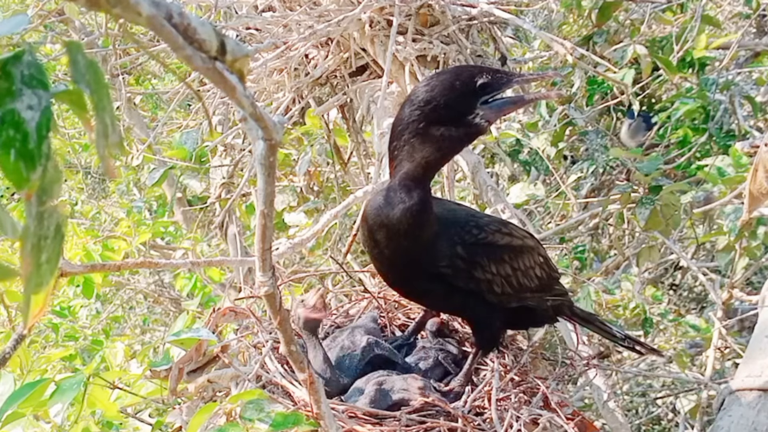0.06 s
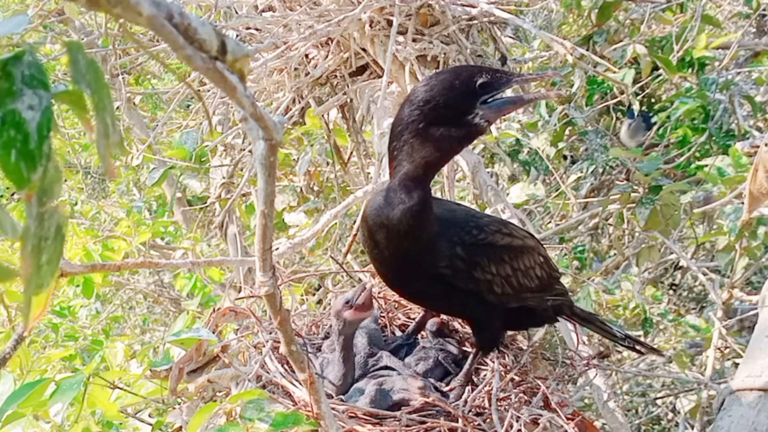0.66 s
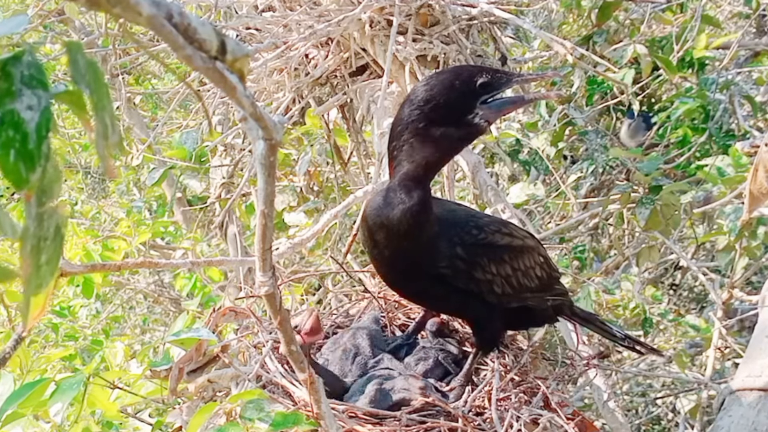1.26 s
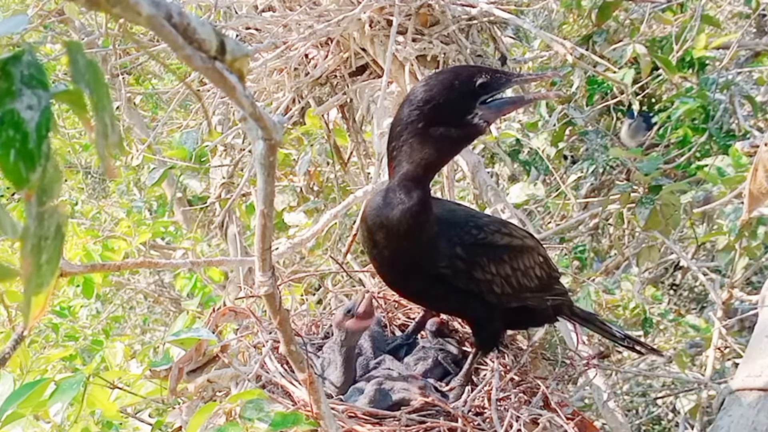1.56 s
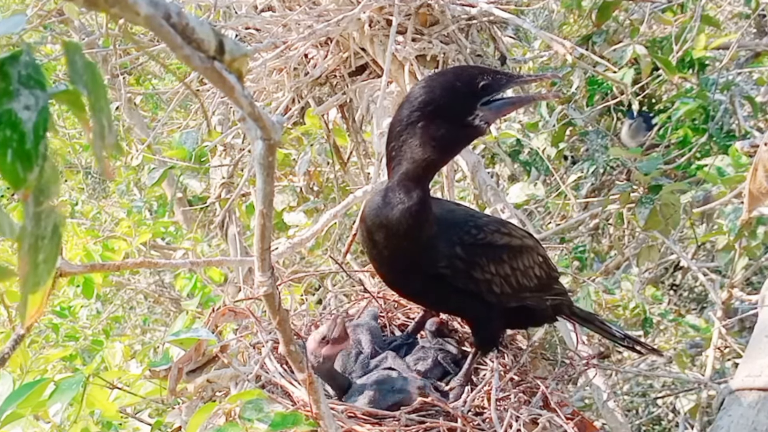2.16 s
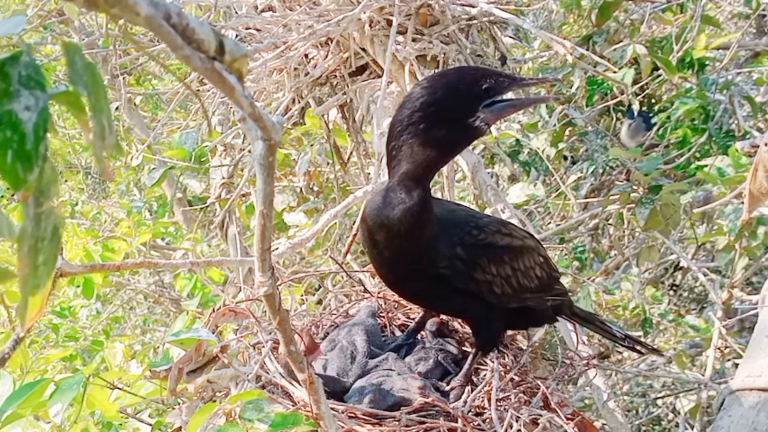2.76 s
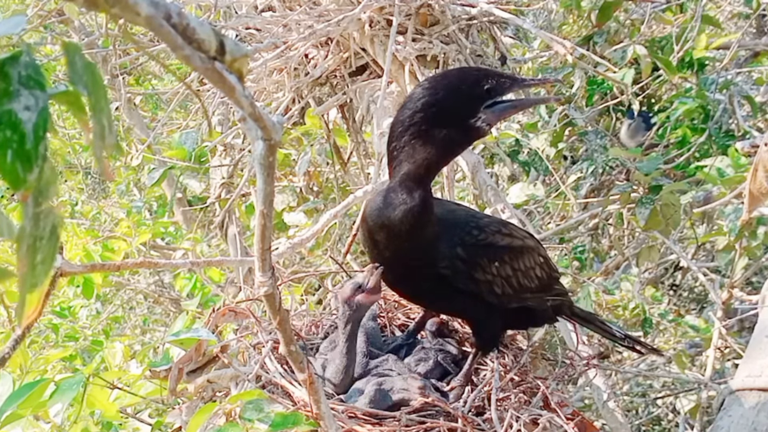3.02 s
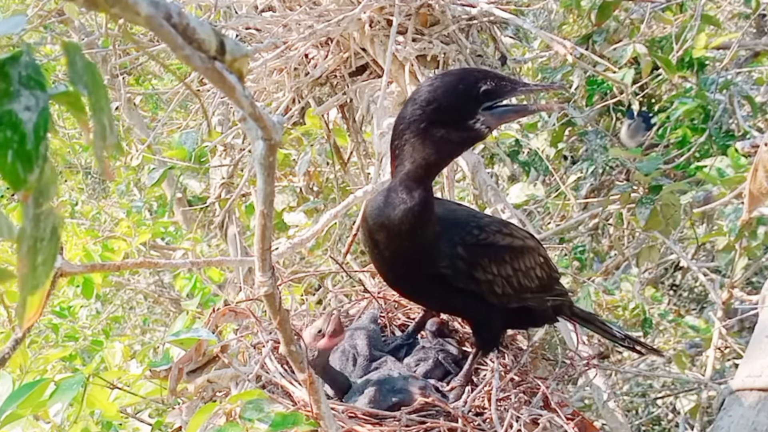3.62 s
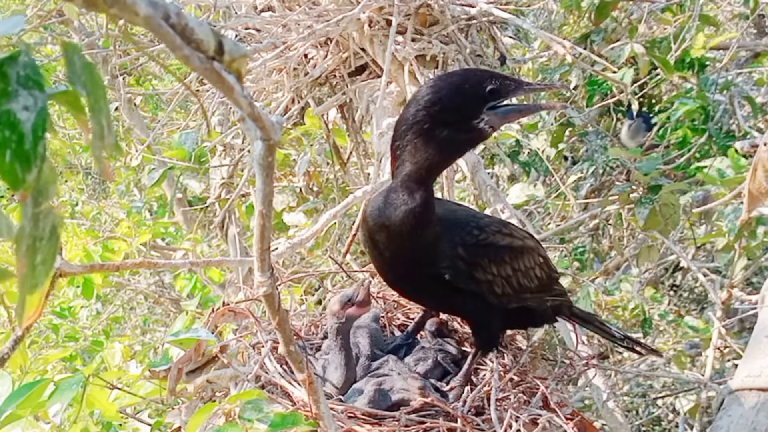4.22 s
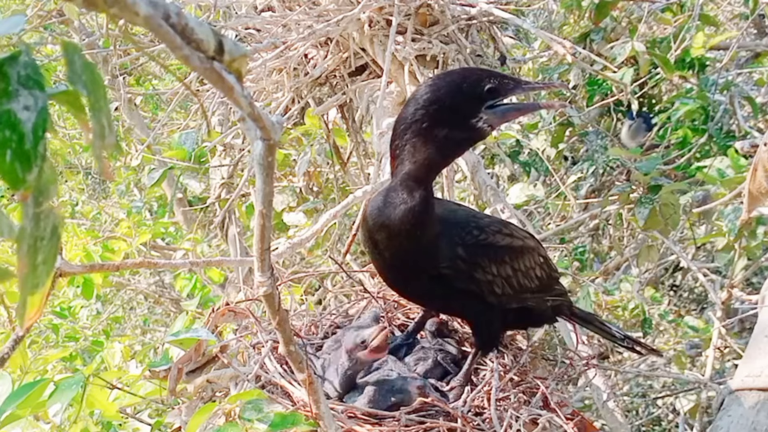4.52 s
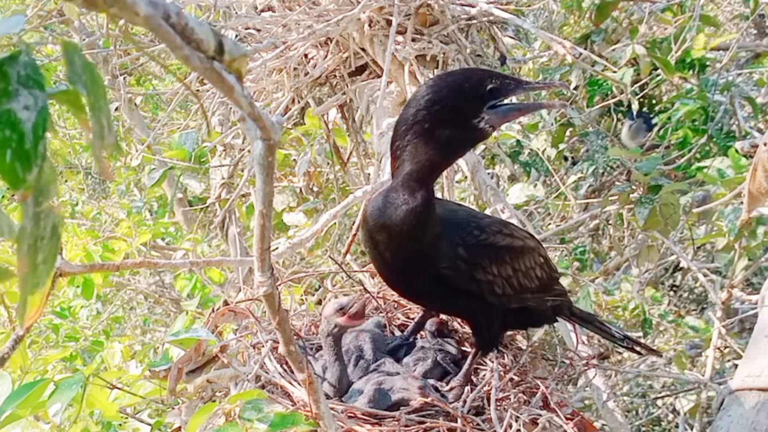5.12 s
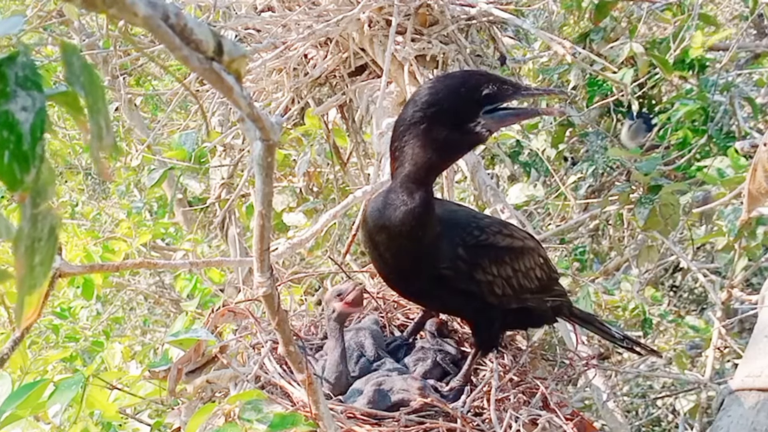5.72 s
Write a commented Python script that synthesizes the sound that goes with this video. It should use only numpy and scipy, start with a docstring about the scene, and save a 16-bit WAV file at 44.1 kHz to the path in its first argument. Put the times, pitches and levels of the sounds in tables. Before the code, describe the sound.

Cormorant chicks beg in a tree nest a few metres away, over faint open-air noise. From the start, one chick gives very short, sharp, nasal yips, about four or five a second with occasional gaps. A second chick answers with softer, brief creaks at a similar pace. Beneath them a hoarse, breathy hiss comes in bouts of up to half a second. Thin, faint squeaks are scattered throughout, and muffled little grunts fall between the calls during the first three seconds. At about 3 seconds the yips become louder and rougher, and they stay prominent until the end at about 6 seconds. From around 4 to 5 seconds, and again from about 5.4 seconds, birds at other nests add faint, mostly falling nasal calls and short rasps further off. The surrounding twigs and leaves give only a very short, light echo.

```python
"""Short, sharp yips, about 4.5 a second: a cormorant chick begging in a tree nest a few metres away.
Another answers with softer creaks; thin squeaks and muffled grunts fall between, over a hoarse hiss.
The voices are syrinx pulses ringing in throat and beak; the hiss is air forced through an open throat.
Other birds call further off in faint open-air noise. Twigs and leaves scatter a short echo."""
import sys
import numpy as np
from scipy import signal
from scipy.fft import rfft, irfft
from scipy.io import wavfile
from scipy.ndimage import map_coordinates

SR = 44100
rng = np.random.default_rng(int(sys.argv[2]) if len(sys.argv) > 2 else 0)


def wav_record(signal):
    """Record a signal, one row per channel, as 16-bit PCM in the file named by sys.argv[1]."""
    frames = np.transpose(np.atleast_2d(signal))
    bounded = np.clip(frames, -1, 1)
    # unit amplitude maps onto the largest positive 16-bit level
    quanta = np.round(bounded * 32767).astype(np.int16)
    wavfile.write(sys.argv[1], SR, quanta)


N = 263718


def undb(db):
    """Decibels to gain."""
    return 10 ** (np.asarray(db) / 20)


def level(x, db):
    """Scale to an rms level."""
    return x * undb(db) / np.sqrt(np.mean(x ** 2) + 1e-18)


def call_level(x, length_s, db):
    """Scale a call so that its energy, spread over length_s, has this level."""
    return level(x, db) * np.sqrt(max(length_s, 1 / SR) * SR / len(x))


def call_time(length_s, size=4096):
    """Position in a call, 0 to 1, running on past 1 for the ring-out."""
    return np.arange(size) / SR / max(length_s, .005)


def add(out, start_s, x):
    """Mix a short sound in at start_s."""
    i = max(int(start_s * SR), 0)
    out[i:i + len(x)] += x[:len(out) - i]


def walk(rate_hz, size=N):
    """Smooth random wander, spread near 1."""
    steps = rng.standard_normal(8192)
    return np.interp(np.arange(size) / SR * rate_hz, np.arange(len(steps)), steps)


def colour(x, points, size=2048):
    """Minimum-phase filter through (freq_hz, gain_db) points; rings like a cavity."""
    hz, db = np.transpose(points)
    bins_hz = np.fft.rfftfreq(size, 1 / SR)
    gain = undb(np.interp(np.log(bins_hz + 1), np.log(hz), db))
    cepstrum = irfft(np.log(gain))
    cepstrum[1:size // 2] *= 2
    cepstrum[size // 2 + 1:] = 0
    impulse = irfft(np.exp(rfft(cepstrum)))
    return signal.fftconvolve(x, impulse)[:len(x)]


def band(x, hz, kind):
    """Steep low-, band- or high-pass."""
    return signal.sosfilt(signal.butter(4, hz, kind, fs=SR, output="sos"), x)


def resonance(x, hz, width_hz):
    """One resonance, unity gain at its centre."""
    return signal.lfilter(*signal.iirpeak(hz, hz / width_hz, fs=SR), x)


def sway(x, ratio):
    """Shift all frequencies by a varying ratio, as throat and beak change shape."""
    return map_coordinates(x, [np.cumsum(ratio)], order=3, mode="mirror")


def syrinx(pitch_hz, jitter, shimmer_db, breath):
    """Membranes snap shut once a cycle, unevenly, and pass a bright puff of turbulent air."""
    cycle = np.cumsum(pitch_hz) / SR
    scatter = rng.standard_normal((256, 2))  # per cycle: pitch, level
    phase = np.cumsum(pitch_hz * np.exp(jitter * scatter[cycle.astype(int), 0])) / SR
    snaps = np.diff(np.floor(phase), prepend=-1)
    turbulence = np.diff(rng.standard_normal(len(pitch_hz) + 1))
    puffs = np.exp(-(phase % 1)) * turbulence
    shimmer = undb(shimmer_db * scatter[phase.astype(int), 1])
    return (level(snaps, 0) + breath * level(puffs, 0)) * shimmer


def open_air(level_db=-53.5, wander_db=.5):
    """Faint background noise; the level wanders slightly."""
    # freq_hz, gain_db
    spectrum = [(20, -42), (40, -5), (70, 4), (130, 5), (250, -2.5), (500, -3), (1000, 0.5), (2000, -21.5),
                (3400, -4), (5000, -12), (8800, -8.5), (12000, -82), (15500, -39)]
    noise = colour(rng.standard_normal(N), spectrum)
    return level(noise, level_db) * undb(wander_db * walk(4.1))


def foliage(x, wet_db, t60_s):
    """Diffuse scatter from nest, twigs and leaves."""
    t = np.arange(SR // 2) / SR
    tail = rng.standard_normal(len(t)) * np.exp(-np.log(1000) * t / t60_s) * (t > .002)
    tail = colour(tail, [(200, -16.5), (3500, -13.5), (7000, -7.5), (15000, -13.5)])
    tail /= np.sqrt(np.sum(tail ** 2))
    return undb(wet_db) * signal.fftconvolve(x, tail)[:N]


def far_rasps(trim_db=-1, length_s=.062, width_hz=450):
    """Short, toneless begging calls from other nests: swells of resonant breath noise."""
    # start_s, level_db, centre_hz
    calls = [(3.87, -49.5, 1320), (4.409, -45, 2190), (4.419, -48, 1210), (4.671, -41, 1860),
             (5.40, -46, 2050), (5.414, -45, 3050)]
    out = np.zeros(N)
    swell = np.sin(np.pi * np.minimum(call_time(length_s), 1))
    for start_s, level_db, centre_hz in calls:
        breath = swell * rng.standard_normal(len(swell))
        rasp = resonance(resonance(breath, centre_hz, width_hz), centre_hz, width_hz)
        add(out, start_s, call_level(rasp, length_s, level_db + trim_db))
    return out


def far_calls(trim_db=-2, waver=.02, breath=.7):
    """Nasal, mostly falling calls from other nests: wavering harmonics plus breath noise."""
    # start_s, length_s, first_hz, last_hz, level_db
    calls = [(4.072, .16, 324, 312.7, -41.5), (4.281, .1, 352, 269, -41.5), (4.358, 0.12, 433.5, 459, -42),
             (4.486, 0.18, 409, 386.6, -43), (4.671, .23, 369.5, 334, -42.5),
             (5.367, .19, 336.6, 266.6, -48.5), (5.757, .22, 323.7, 280, -43.5)]
    # freq_hz, gain_db
    tract = [(300, -16.5), (600, -10), (850, -3), (1200, -3), (1550, 4.5), (1850, 4), (2250, -6),
             (3000, -38), (5000, -8), (12000, -70)]
    out = np.zeros(N)
    for start_s, length_s, first_hz, last_hz, level_db in calls:
        t = np.arange(0, length_s, 1 / SR)
        glide_hz = np.interp(t, [0, length_s], [first_hz, last_hz])
        phase = np.cumsum(glide_hz * (1 + waver * walk(54, len(t)))) / SR
        harmonics = sum(np.cos(2 * np.pi * k * phase) for k in range(1, 13))
        voice = colour(level(harmonics, 0) + breath * rng.standard_normal(N)[:len(t)], tract)
        add(out, start_s, level(voice, level_db + trim_db) * signal.windows.tukey(len(t), .35))
    return out


def bout_envelope(start_s, length_s, attack_s=.03, sag_db_per_s=2.5, release_s=.083):
    """A bout of hissing swells, sags as the air runs out and dies away."""
    age_s = np.arange(N) / SR - start_s
    attack = np.clip(age_s / attack_s, 0, 1)
    sag = undb(-sag_db_per_s * np.clip(age_s, 0, length_s))
    release = np.exp(-np.maximum(age_s - length_s, 0) / release_s)
    return attack * sag * release


def hiss(throat_trim_db=3, top_trim_db=2):
    """Air forced through a chick's open throat in bouts; a fluttering constriction makes it hoarse."""
    # start_s, length_s, throat_db, top_db
    bouts = [(0.0, 0.042, -45, -52.5), (0.112, 0.34, -40.5, -50), (0.541, 0.18, -39.5, -47.5),
             (0.808, 0.45, -39.5, -49), (1.275, 0.36, -40, -49.5), (1.75, .05, -48, -61),
             (2.175, 0.051, -44, -54), (2.49, 0.37, -41.5, -53), (2.865, 0.4, -40.5, -52),
             (3.245, 0.26, -42, -54), (3.6, .13, -46.5, -61), (3.94, 0.44, -48, -60.5),
             (4.347, .14, -43, -53.5), (4.518, 0.4, -43, -52.5), (4.986, 0.041, -43, -53.5),
             (5.197, 0.069, -46, -57), (5.578, 0.1, -45, -57.5), (5.724, 0.2, -43, -53.5)]
    # freq_hz, gain_db
    tract = [(400, -28.5), (900, -21), (1500, -5), (2100, -1.5), (2750, 0), (3350, 5), (3750, -0.5),
             (4200, -12), (5200, -28), (7000, -60), (12000, -61)]
    # freq_hz, gain_db
    airy_top = [(4000, -6.5), (6000, -8), (7500, -8), (8500, 6.5), (9400, -2.5), (10600, 3), (11500, -5.5),
                (12700, -14), (14300, -10.5), (15500, -23)]
    throat_gain, top_gain = undb(-52), undb(-64)  # floor between bouts
    for start_s, length_s, throat_db, top_db in bouts:
        envelope = bout_envelope(start_s, length_s)
        throat_gain = np.maximum(throat_gain, undb(throat_db) * envelope)
        top_gain = np.maximum(top_gain, undb(top_db) * envelope)
    flutter_db = 1.6 * walk(700) + .7 * walk(45)
    throat = colour(undb(flutter_db) * rng.standard_normal(N), tract)
    top = colour(undb(2 * flutter_db) * rng.standard_normal(N), airy_top)
    # a beak reflection combs the treble; the comb slides as the head waves
    lag_s = .0007 + .00008 * walk(9)
    top = top + .35 * map_coordinates(top, [np.arange(N) - lag_s * SR], order=3)
    gape = 1 + .024 * walk(9)
    throat = level(sway(throat, gape), throat_trim_db)
    top = level(sway(top, gape), top_trim_db)
    return throat * throat_gain + top * top_gain


def squeaks(length_s=.028, first_hz=920, fall=.14):
    """Faint, high notes that slide down with the beak nearly closed."""
    # start_s, level_db
    calls = [(0.226, -41), (0.4953, -39.5), (1.8741, -42), (2.1256, -42.5), (2.9524, -43), (3.3237, -42.5),
             (4.6687, -45), (4.9069, -43.5), (5.3249, -44), (5.5808, -43.5)]
    # freq_hz, gain_db
    tract = [(1500, -4), (3000, 0), (3600, 13), (4400, 9), (5100, -1), (5700, 8.5), (6500, -28), (8100, 6),
             (9600, 4), (11200, -39), (15000, -24)]
    out = np.zeros(N)
    u = np.minimum(call_time(length_s), 1)
    for start_s, level_db in calls:
        source = syrinx(first_hz * (1 - fall * u), jitter=.02, shimmer_db=1.5, breath=.3)
        voice = colour(np.sin(np.pi * u) * source, tract)
        add(out, start_s, call_level(voice, length_s, level_db))
    return out


def grunts(trim_db=-1, length_s=.0412, base_hz=421.2, rise_hz=75.6):
    """Low, closed-beak notes; pitch rises and falls with the swell."""
    # start_s, level_db
    calls = [(0.32, -42.5), (0.51, -39.5), (0.59, -39), (0.72, -41), (1.019, -41), (1.79, -40), (2.36, -46),
             (2.569, -43), (2.87, -52)]
    # freq_hz, gain_db
    tract = [(300, -12), (560, 7), (800, -5), (1150, -1), (3000, 17), (6000, -11)]
    out = np.zeros(N)
    swell = np.sin(np.pi * np.minimum(call_time(length_s), 1))
    for start_s, level_db in calls:
        source = syrinx(base_hz + rise_hz * swell, jitter=.02, shimmer_db=4.5, breath=.3)
        voice = colour(swell * source, tract)
        add(out, start_s, call_level(voice, length_s, level_db + trim_db))
    return out


def creaks(low_trim_db=-1, usual_db=-30):
    """The second chick: syrinx pulses that speed up and fade; a harder creak is brighter."""
    # start_s, level_db, length_s
    calls = [(0.164,-28.5,0.034), (0.376,-30.5,0.043), (0.595,-33.5,0.031), (0.809,-33.5,0.031),
             (1.026,-38,.037), (1.521,-27.5,0.035), (1.758,-31.5,0.04), (1.972,-32.5,0.057),
             (2.197,-33,0.049), (2.429,-32.5,0.037), (2.6433,-31.5,0.035), (2.862,-32.5,0.038),
             (3.099,-39,.031), (3.673,-32,0.04), (3.9,-30.5,.04), (4.117,-30,0.039), (4.333,-29.5,0.038),
             (4.98,-27.5,0.034), (5.014,-44.5,.045), (5.196,-28.5,0.032), (5.237,-40.5,0.025),
             (5.748,-33.5,.035)]
    # freq_hz, gain_db
    tract = [(300, -28.5), (520, -13), (850, -12.5), (1700, -13), (2150, -3), (2650, -4), (3100, 8),
             (3750, -3.5), (4150, -3.5), (4900, -19.5), (6100, -11), (8400, -18.5), (10200, -26),
             (14000, -47)]
    out = np.zeros(N)
    for start_s, level_db, length_s in calls:
        u = call_time(length_s)
        pitch_hz = np.interp(u, [0, .3, .55, 1], [340, 458.7, 558.5, 525])
        envelope = np.interp(u, [0, .3, .55, .8, 1.15], [.25, 1, .9, .4, 0])
        source = syrinx(pitch_hz, jitter=.035, shimmer_db=1.4, breath=.3)
        voice = colour(envelope * source, tract)
        treble_db = -36 + 1.37 * (level_db - usual_db)
        low = call_level(band(voice, 4700, "lowpass"), length_s, level_db + low_trim_db)
        treble = call_level(band(voice, 5300, "highpass"), length_s, treble_db)
        add(out, start_s, low + treble)
    return out


def yips(arch=.2, sink=.036, usual_hz=676, usual_db=-19):
    """Abrupt nasal yelps, rougher when loud; pitch arches, resonances sink as the beak closes."""
    # start_s, effort_db, pitch_hz, beak_hz, beak_re_effort_db, length_s
    calls = [(0.157,-24.5,653,3600,3,0.018), (0.659,-26,580,3470,2.5,.016),
             (0.8717,-22.5,707,3260,2.5,0.017), (1.089,-20.5,703,3450,1.5,0.024),
             (1.3,-20,697,3700,-8,0.02), (1.515,-22,718,3260,-13,0.021), (1.7257,-21,727,4040,-3,0.017),
             (1.9325,-22.5,732,4100,1,.02), (2.1585,-22.5,699,4030,0,0.025), (2.7032,-26,618,3860,.5,.019),
             (2.92,-22.5,677,3940,0,.019), (3.154,-15.5,703,3140,-3,0.019),
             (3.3667,-13,694.5,3470,-1.5,0.019), (3.579,-13,770,3640,-2,0.02),
             (3.783,-14.5,831,3390,0.5,0.02), (4.0243,-17,572,3060,0,.013),
             (4.3418,-17.5,572.3,2940,2.5,.02), (4.5524,-15.5,662,3620,-1,0.021),
             (4.771,-16,715,3740,0,0.019), (4.9896,-15,702,3690,-1,.017), (5.2055,-14,714,3500,-1,.021),
             (5.680,-20,623,3200,3.5,0.016), (5.8823,-18,704,3520,3,0.021)]
    # freq_hz, gain_db
    tract = [(300, -29.5), (700, -15.5), (950, -15), (1400, -16.5), (2200, -1), (2800, 0.5), (3500, 6),
             (4150, 0), (5050, -20.5), (6150, -7.5), (6900, -23), (8300, -12.5), (12500, -29), (15200, -21)]
    # time_s, upper_edge_hz
    treble_edge = [(0.5, 10100), (2.05, 15900), (2.7, 12200), (3.65, 14900), (4.7, 10150), (5.9, 11200)]
    out = np.zeros(N)
    for start_s, effort_db, pitch_hz, beak_hz, beak_re_effort_db, length_s in calls:
        u = call_time(length_s)
        arc = 2 * np.minimum(u, 1) - 1
        gape = 1 - sink * arc
        contour_hz = pitch_hz * (1.04 - arch * arc ** 2) / gape  # so sway moves only the resonances
        envelope = np.interp(u, [0, .25, .9, 1.1], [.95, 1, .8, 0])
        jitter = np.interp(effort_db, [-21, -13], [.028, .047])
        source = syrinx(contour_hz, jitter, shimmer_db=1.3, breath=.7)
        voice = colour(envelope * source, tract)

        beak = resonance(band(voice, [2700, 4900], "bandpass"), beak_hz, width_hz=620)
        low = band(voice, 1967, "lowpass")
        throat_hz = 2366 * (pitch_hz / usual_hz) ** .92
        throat = .55 * low + resonance(low, throat_hz, width_hz=330)
        tightening = np.interp(u, [0, .5], [.45, 1])  # treble builds as the throat tightens
        treble = tightening * band(voice, 5200, "highpass")
        edge_hz = np.interp(start_s, *np.transpose(treble_edge))
        treble = colour(treble, [(.85 * edge_hz, 0), (1.15 * edge_hz, -11)])

        # a harder yip gains treble; its throat band hardly grows
        beak_db = effort_db + beak_re_effort_db
        throat_db = -24.5 + .21 * (effort_db - usual_db)
        treble_db = -26.5 + 1.27 * (effort_db - usual_db)
        for part, part_db in (beak, beak_db), (throat, throat_db), (treble, treble_db):
            add(out, start_s, call_level(sway(part, gape), length_s, part_db))
    return out


def scene():
    """The nest close by, the colony behind it and the open air; mono."""
    chicks = yips() + creaks() + grunts() + squeaks() + hiss()
    colony = far_calls() + far_rasps()
    far_echo = foliage(colony, wet_db=-9, t60_s=.2)
    air = open_air()
    near_echo = foliage(chicks, wet_db=-13, t60_s=.04) + foliage(chicks, wet_db=-22, t60_s=.2)
    return (air + colony + far_echo + chicks + near_echo)[None]


def record(dry, low_hz=45, top_hz=15600):
    """Drop the deepest bass and cut the top steeply."""
    highpass = signal.butter(2, low_hz, "highpass", fs=SR, output="sos")
    lowpass = signal.ellip(8, .2, 70, top_hz, fs=SR, output="sos")
    return signal.sosfilt(lowpass, signal.sosfilt(highpass, dry))


dry = scene()
out = record(dry)
wav_record(out)
```